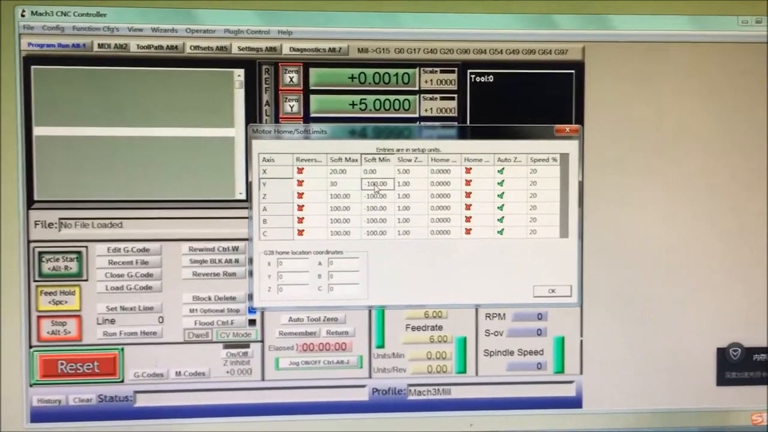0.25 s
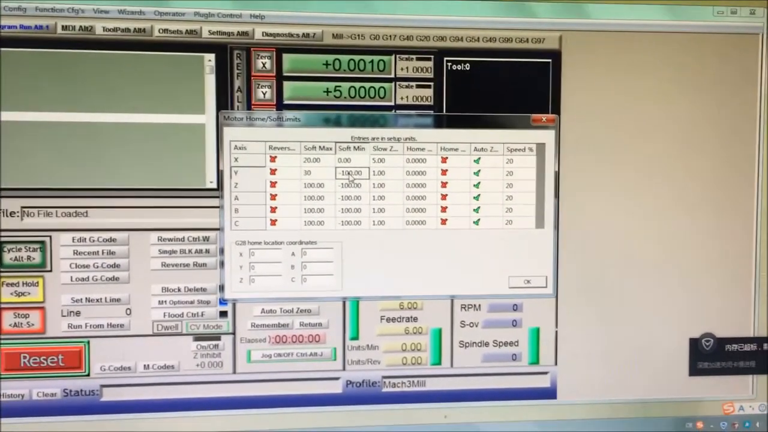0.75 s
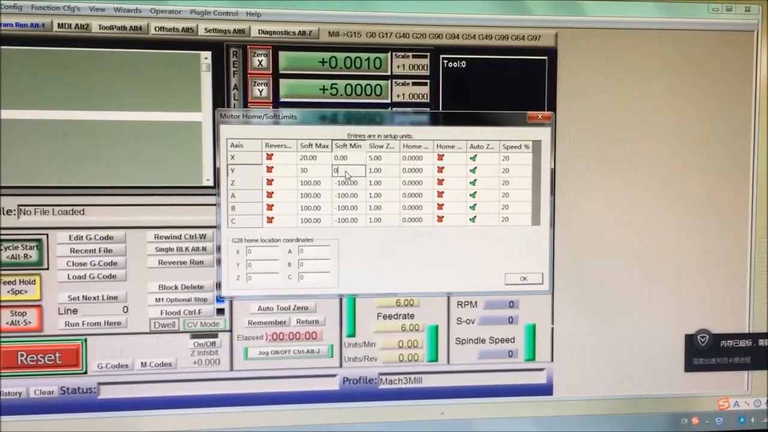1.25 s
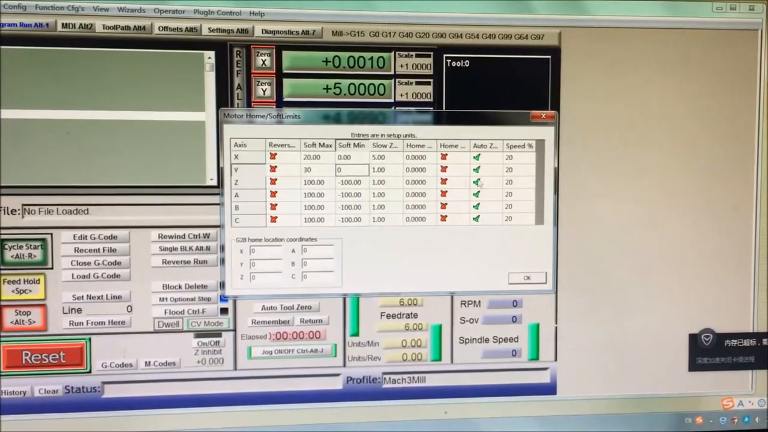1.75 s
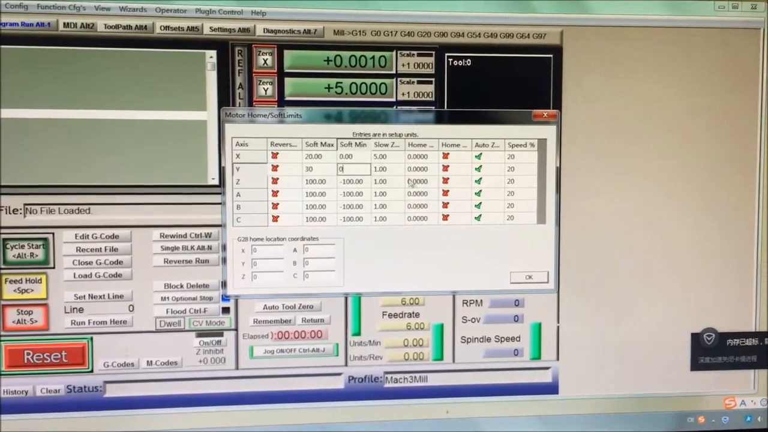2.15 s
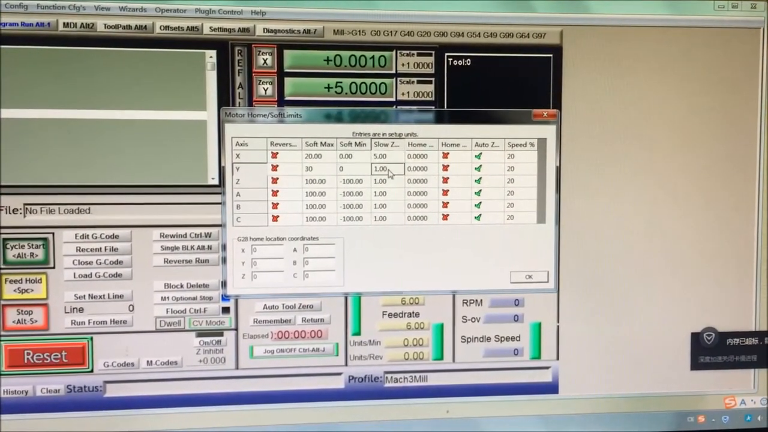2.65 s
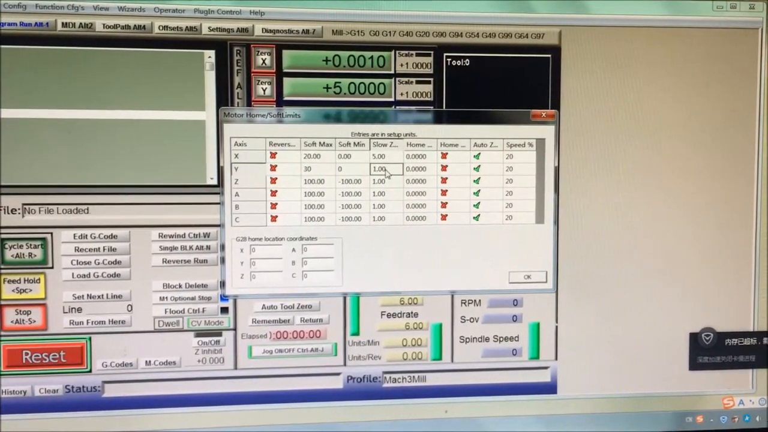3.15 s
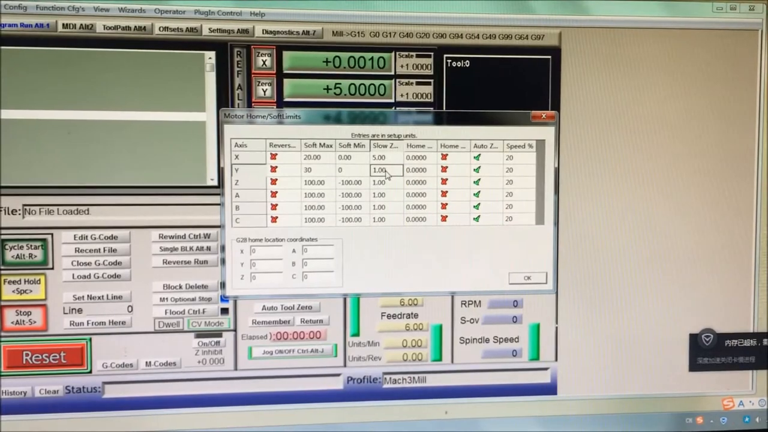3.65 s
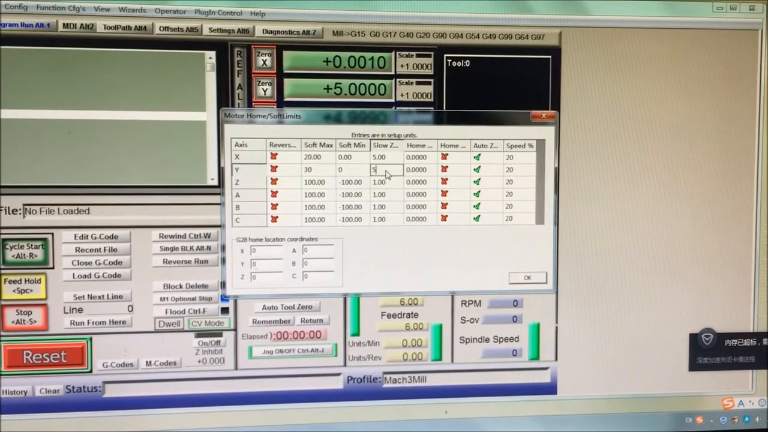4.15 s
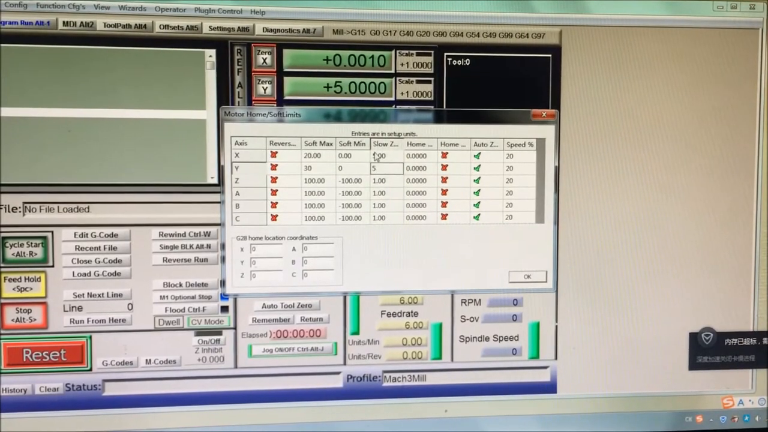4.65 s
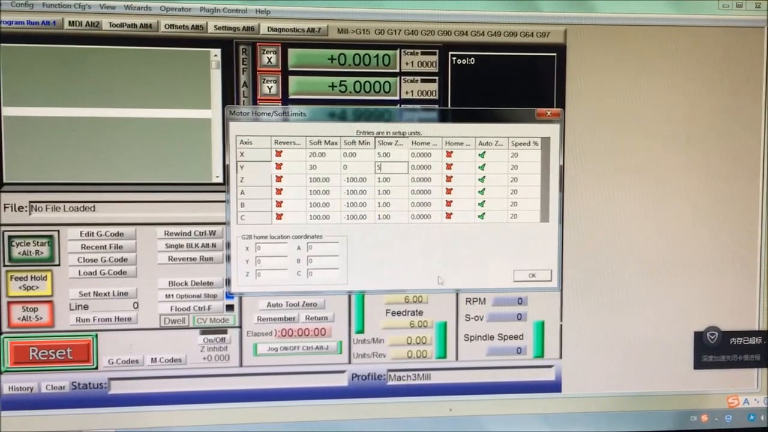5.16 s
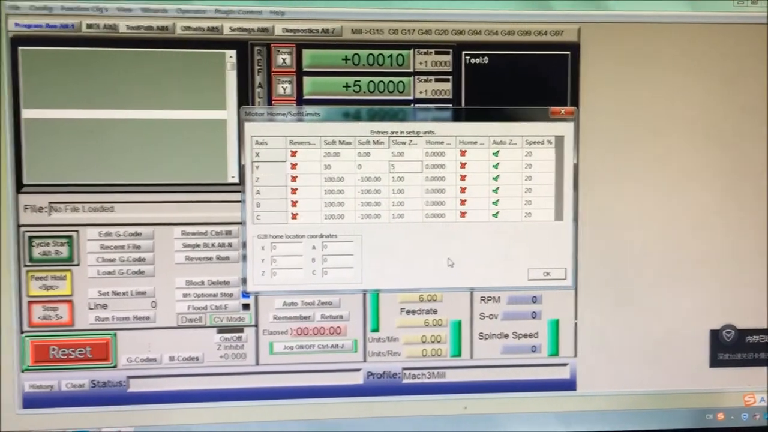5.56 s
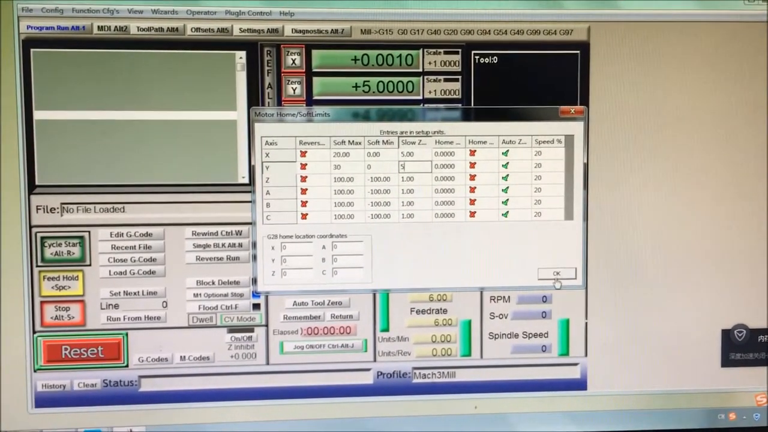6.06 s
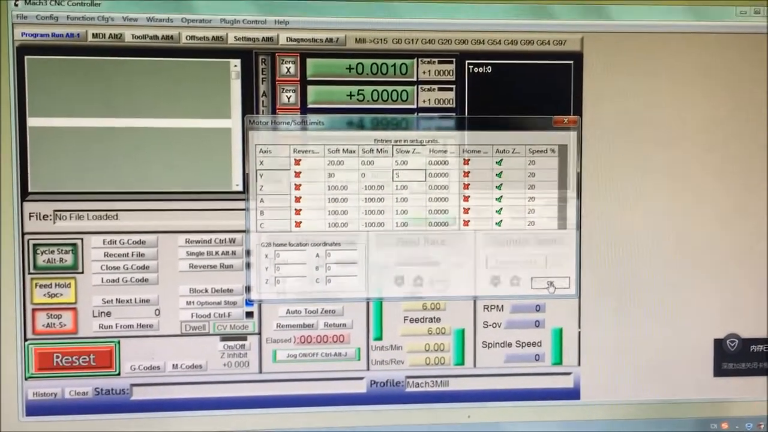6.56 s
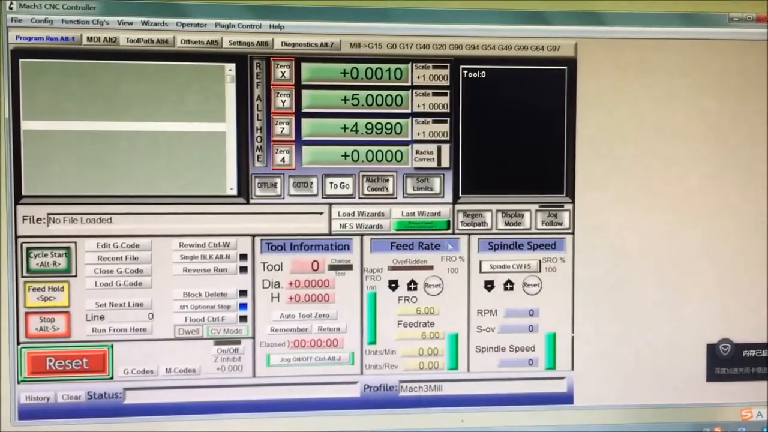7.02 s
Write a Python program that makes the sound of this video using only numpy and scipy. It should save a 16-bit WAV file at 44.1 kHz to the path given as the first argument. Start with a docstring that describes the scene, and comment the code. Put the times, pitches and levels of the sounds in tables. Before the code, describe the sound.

Scattered mouse clicks and two single keyboard keystrokes, with soft desk thumps and sleeve swishes, over a faint computer hum in a quiet room.

```python
"""A desk in a small, quiet room, where someone edits two numbers at a computer.
The mouse clicks, and twice a single keystroke thumps the desk: each impact excites damped modes of
the struck part, followed by scatter from desk and screen and by the room's reverberation.
A sleeve swishes by friction as the hand crosses to the keyboard and back to land on the mouse.
Behind it all, the computer's fan and drive hum over a low rumble and an airy hiss."""
import sys
import numpy as np
from scipy import signal
from scipy.fft import rfft, irfft, next_fast_len
from scipy.io import wavfile
from scipy.ndimage import map_coordinates

SR = 44100
rng = np.random.default_rng(int(sys.argv[2]) if len(sys.argv) > 2 else 0)


def master(y):
    """Save y as 16-bit WAV."""
    cut = np.clip(np.atleast_2d(y).T, -1, 1)
    pcm = np.round(cut * 32767)  # scale
    wavfile.write(sys.argv[1], SR, pcm.astype(np.int16))


N = 321489

# Key contacts: finger meets cap, cap bottoms out, cap springs back. Each row: start in seconds,
# cap level in dB, stem level in dB, relative case level in dB, pitch ratio, key (0 or 1).
KEY_CONTACTS = [(1.0820, -28, -37.5, -35.5, 1, 0), (1.1134, -43, -24.5, -29, 1.01, 0),
                (1.1947, -34, -26.5, -28.5, 1.004, 0), (3.8912, -29, -30.5, -35, 1.02, 1),
                (3.9155, -39, -24.5, -32, 0.92, 1), (4.0263, -30.5, -27.5, -29.5, 0.98, 1)]
# Spectra of the key cap, the stem striking its stop, and the hollow case.
# Each row: frequency in Hz, relative spectral density in dB.
CAP_SPECTRUM = [(400, -32.5), (1800, -16), (2600, 2), (4000, -1.5), (5000, 0), (6000, 2.5), (8500, -1),
                (9600, -11.5), (12000, -9.5), (15000, -12)]
STEM_SPECTRUM = [(400, -36), (1500, -15.5), (2100, -11.5), (2500, 2.5), (3350, 2.5), (3900, -11),
                 (5000, -24.5), (9000, -46)]
CASE_SPECTRUM = [(150, -25), (400, -12.5), (600, -4), (740, -9), (1000, -3.5), (1500, 5), (2000, -5),
                 (3200, -16), (4200, -26), (9000, -45)]
# Distinct modes of the keyboard's case. Each row: frequency in Hz, 60 dB decay time in seconds,
# relative level in dB under key 0, the same under key 1.
CASE_MODES = [(970, 0.07, 2.5, -14.5), (1060, 0.1, -10, 4.5), (1244, .09, -7, -18.5), (1418, 0.1, -2, -2),
              (1555, 0.14, -5.5, -6), (1780, 0.043, 2, -14.5), (1960, 0.068, 1, -16),
              (2490, 0.092, -6, -11), (2650, 0.16, -12, -11), (3110, .16, -13, -12), (3210, 0.08, -18, -10),
              (3440, 0.097, -20, -4), (8260, .11, -33, -14)]
# Partials of a freed key's spring.
# Each row: start in seconds, frequency in Hz, level in dB, 60 dB decay time in seconds.
SPRING_PARTIALS = [(1.1946, 906, -57, 1.85), (1.1946, 1463, -56.5, 0.54), (1.1946, 2835, -70, 2.2),
                   (4.026, 988, -64, 1.6), (4.026, 1787, -62, 0.62), (4.026, 2800, -69, .45),
                   (4.026, 3070, -66, 0.77)]
# Mouse clicks. Each row: start in seconds, level in dB, pitch ratio, stroke (0 press, 1 release).
BUTTON_CLICKS = [(0.0192, -38, 0.97, 1), (2.6545, -41.5, 0.97, 0), (2.8014, -37.5, 0.96, 1),
                 (5.489, -40.5, 1, 0), (5.571, -37, 0.99, 1), (6.4976, -41.5, 1, 0), (6.6310, -38, 0.98, 1)]
# Modes of the switch and its shell. Each row: nominal frequency in Hz, nominal width in Hz,
# relative level in dB on press, the same on release.
SWITCH_MODES = [(2060, 420, -34, -17.5), (3970, 440, -25, -13.5), (5300, 890, -19, -33),
                (6500, 510, -10, -10), (6975, 400, -0.5, 5), (8900, 890, -15, -8), (10050, 430, -12.5, -8),
                (11320, 400, -5.5, -5.5), (12230, 700, -6.5, -13), (14300, 1000, -11, -2.5)]
# Thin after-ring of the steel leaf. Each row: nominal frequency in Hz, 60 dB decay time in seconds,
# level in dB relative to the click on press, the same on release.
LEAF_MODES = [(6880, 0.15, -34, -31), (12100, 0.14, -17, -30), (14400, .12, -31, -19)]
# Soft bumps of the hand on plastic, and a fingernail landing on the mouse.
# Each row: start in seconds, level in dB.
HAND_BUMPS = [(1.735, -58), (3.029, -59.5), (3.847, -58), (4.5958, -41), (4.633, -44), (5.419, -58.5)]
NAIL_TAPS = [(4.8691, -31.5)]
# Spectra of the bumped shell and the nail's tap.
# Each row: frequency in Hz, relative spectral density in dB.
SHELL_SPECTRUM = [(120, 2), (220, -2), (400, -17), (700, -11), (880, 6.5), (1060, 0), (1350, -12),
                  (1800, -3.5), (2200, -17), (2750, -10.5), (3600, -19.5), (5000, -30), (12000, -42.5)]
NAIL_SPECTRUM = [(300, -23), (1000, -3.5), (1700, -6), (1950, 2.5), (2300, 2), (2600, -8), (4000, -11.5),
                 (4500, -4), (5900, -2), (7600, -14), (9200, -2.5), (10000, -18), (11500, -11),
                 (15000, -30)]
# Blows of hand and keys on the desk top. Each row: start in seconds, level in dB, frequency in Hz.
DESK_BLOWS = [(.13, -54, 190), (0.302, -51.5, 229), (1.112, -40.5, 66), (3.028, -47, 212),
              (3.085, -51.5, 148), (3.919, -38.5, 70), (4.597, -45, 132), (5.644, -54, 176),
              (6.375, -42.5, 137), (6.974, -46, 156)]
# A fingertip or key stem rubs on plastic.
# Each row: midpoint in seconds, half-duration in seconds, level in dB, centre frequency in Hz.
PLASTIC_RUBS = [(1.182, .02, -65, 7500), (2.744, 0.076, -71.5, 3250), (3.53, .12, -71.5, 3000)]
# Slides of the arm. Each row: time of reaching full speed in seconds, hold in seconds,
# release time in seconds, level in dB.
ARM_SLIDES = [(.29, .05, .45, -73), (0.628, 0.073, 0.64, -62), (1.337, 0.026, .3, -58.5),
              (1.7, 0.045, 0.22, -72), (3.244, 0.15, 0.31, -60), (3.6, 0.17, 0.59, -71.5),
              (4.22, 0.12, 0.15, -58), (4.61, 0.062, 0.2, -62.5)]
# Spectrum of sliding cloth. Each row: frequency in Hz, relative spectral density in dB.
CLOTH_SPECTRUM = [(400, -5.5), (1200, -1.5), (2600, -3.5), (3050, -3), (3500, -3), (4900, -5.5),
                  (5450, -0.5), (6900, -0.5), (7600, -4), (8400, -1.5), (9000, -2), (10400, -5.5),
                  (12500, -1), (15500, -9)]
# Tones of the drive and fan. Each row: frequency in Hz, relative level in dB.
HUM_TONES = [(91.5, -65), (204.6, -70), (613.7, -81.5), (1292, -84.5), (1432, -83), (1567, -84),
             (1637, -77.5)]
# Spectra of the computer case's rumble and the fan's hiss.
# Each row: frequency in Hz, relative spectral density in dB.
RUMBLE_SPECTRUM = [(30, -17), (41, -3), (49, 4.5), (60, -2.5), (72, -1.5), (105, -8), (138, -2),
                   (165, -5.5), (205, -3), (240, -12.5), (305, -12), (370, -20.5), (500, -25.5), (900, -66)]
HISS_SPECTRUM = [(250, -5.5), (450, -4), (600, 3.5), (760, -1.5), (1100, -3), (1600, -2.5), (1850, -4.5),
                 (2800, -8), (4900, -15), (6000, -12), (7700, -15.5), (9500, -11.5), (10400, -15),
                 (12500, -10.5), (15500, -15)]
# Reverberation of the room. Each row: frequency in Hz, 60 dB decay time in seconds.
ROOM_DECAY = [(200, 0.37), (1000, 0.67), (3000, 0.41), (7000, 0.31), (14000, 0.43)]

HIT = 32768  # samples in one impact response
HIT_T, HIT_HZ = np.arange(HIT) / SR, np.fft.rfftfreq(HIT, 1 / SR)


def keyboard():
    """Impact excitation: each contact ticks the cap, clacks the stem and rings the less damped case."""
    out = np.zeros(N)
    for start, cap_db, stem_db, case_db, pitch, key in KEY_CONTACTS:
        hz = HIT_HZ / pitch
        cap = impact(colour(CAP_SPECTRUM, hz), t60=0.018, rise_s=0.00087,
                     snap_db=-0.5, desk_db=-18.5, room_db=-23.5)
        stem = impact(colour(STEM_SPECTRUM, hz), t60=0.022, rise_s=0.001,
                      snap_db=5, desk_db=-21.5, room_db=-22.5)
        case = impact(colour(CASE_SPECTRUM, hz), t60=0.068, rise_s=0.0021,
                      snap_db=-18.5, desk_db=-12, room_db=-14)
        add(out, start, amp(cap_db) * cap + amp(stem_db) * stem)
        add(out, start, amp(case_db - 3.5) * case + amp(case_db - 4.5) * case_ring(key))
    return out


def case_ring(key):
    """Modal superposition: where the key sits sets how strongly each mode of the case is excited."""
    ring = np.zeros(HIT)
    for hz, t60, key0_db, key1_db in CASE_MODES:
        db = (key1_db if key else key0_db) + rng.normal(0, 1.5)  # each contact shares energy anew
        ring += amp(db) * decay(t60) * np.sin(2 * np.pi * (hz * HIT_T + rng.random()))
    onset = 1 - np.exp(-HIT_T / 0.0013)
    return burst(ring * onset)


def key_springs():
    """Free vibration: the spring of a released key rings on in lightly damped partials."""
    out = np.zeros(N)
    for start, hz, db, t60 in SPRING_PARTIALS:
        add(out, start, amp(db) * decay(t60) * np.sin(2 * np.pi * hz * HIT_T))
    return out


def mouse_button():
    """Snap-through: the leaf flips over and back, ringing the same modes at different strengths."""
    out = np.zeros(N)
    for start, db, pitch, released in BUTTON_CLICKS:
        power = amp(-29.5) ** 2  # floor between the resonances
        for hz, width, press_db, release_db in SWITCH_MODES:
            detuning = 2 * (HIT_HZ / pitch - hz) / width
            power += amp(release_db if released else press_db) ** 2 / (1 + detuning ** 2) ** 1.63
        bass_cut = HIT_HZ / (HIT_HZ + 600)
        click = impact(np.sqrt(power) * bass_cut, t60=0.016, rise_s=0.00096,
                       snap_db=-1.5, desk_db=-19.5, room_db=-19.5)
        add(out, start, amp(db) * click)
        for hz, t60, press_db, release_db in LEAF_MODES:
            ring = decay(t60) * np.sin(2 * np.pi * hz * pitch * HIT_T)
            add(out, start, amp(db + (release_db if released else press_db)) * ring)
    return out


def hand_contacts():
    """Contact hardness sets brightness: the soft hand bumps plastic dully, the nail taps it sharply."""
    out = np.zeros(N)
    for start, db in HAND_BUMPS:
        bump = impact(colour(SHELL_SPECTRUM, HIT_HZ), t60=0.036, rise_s=0.0015,
                      snap_db=0, desk_db=-11, room_db=-17.5)
        add(out, start, amp(db) * bump)
    for start, db in NAIL_TAPS:
        tap = impact(colour(NAIL_SPECTRUM, HIT_HZ), t60=0.027, rise_s=0.00058,
                     snap_db=0.5, desk_db=-11.5, room_db=-17.5)
        add(out, start, amp(db) * tap)
    return out


def desk_thumps(decay_cycles=16.3):
    """Constant-Q damping: the desk top rings for a set number of cycles, so deep thumps last longer."""
    out = np.zeros(N)
    for start, db, hz in DESK_BLOWS:
        resonance = (HIT_HZ / hz) ** 3 / (1 + (HIT_HZ / hz) ** 6)
        thump = impact(resonance, t60=decay_cycles / hz, rise_s=0.89 / hz,
                       snap_db=-4.5, desk_db=-14, room_db=-14)
        add(out, start, amp(db) * thump)
    return out


def plastic_rubs():
    """Sliding friction: a fingertip or key stem on plastic gives a brief swell of band-limited noise."""
    out = np.zeros(N)
    for middle, half_s, db, hz in PLASTIC_RUBS:
        band = 1 / (1 + (2.9 * np.log((HIT_HZ + 1) / hz)) ** 2) ** 2
        friction = unit(irfft(rfft(rng.standard_normal(HIT)) * band))
        swell = np.sin(np.pi * np.minimum(HIT_T / (2 * half_s), 1)) ** 2
        add(out, middle - half_s, amp(db) * friction * swell)
    return out


def sleeve(attack_s=0.18, release_drop_db=18):
    """Friction noise: cloth on the desk swells and dies with the arm's speed; its weave flutters it."""
    t = np.arange(N) / SR
    power = np.zeros(N)  # incoherent swishes add in power
    for full_speed_at, hold_s, release_s, db in ARM_SLIDES:
        swell = np.cos(np.pi / 2 * np.clip((full_speed_at - t) / attack_s, 0, 1)) ** 2
        slowing_db = release_drop_db * np.maximum(t - full_speed_at - hold_s, 0) / release_s
        power += (swell * amp(db - slowing_db)) ** 2
    flutter = amp(0.66 * wobble(52))
    return np.sqrt(power) * flutter * noise(CLOTH_SPECTRUM)


def computer():
    """Tonal and broadband machine noise: fan and drive hum unsteadily over case rumble and air hiss."""
    t = np.arange(N) / SR
    tones = np.zeros(N)
    for hz, db in HUM_TONES:
        level = amp(db + 0.83 * wobble(3.06))
        phase = 2 * np.pi * hz * t + 0.75 * wobble(4)
        tones += level * np.sqrt(2) * np.sin(phase)
    rumble = amp(-60.5 + 0.36 * wobble(4.6)) * noise(RUMBLE_SPECTRUM)
    hiss = amp(-67.5) * noise(HISS_SPECTRUM)
    return amp(-1) * tones + rumble + hiss


def impact(gain, t60, rise_s, snap_db, desk_db, room_db):
    """Impulse response: a snap and dense ringing, then scatter from desk and screen, then the room."""
    response = minimum_phase(gain)
    snap = amp(snap_db) * burst(irfft(response))
    ring = filtered_burst(dying_noise(t60, rise_s), response)
    scatter = filtered_burst(dying_noise(t60=0.098, rise_s=0.0075), response)
    # Sound sent out in all directions returns with blunter peaks than the direct path has.
    spread = np.geomspace(0.9, 1.11, 15)
    diffuse_power = sum(np.interp(HIT_HZ * ratio, HIT_HZ, gain ** 2) for ratio in spread)
    reverberation = filtered_burst(room_tail(), minimum_phase(np.sqrt(diffuse_power)))
    return burst(snap + ring) + amp(desk_db) * scatter + amp(room_db) * reverberation


def room_tail(build_up_s=0.0064):
    """Reverberation: the diffuse field decays exponentially in each band, the midrange most slowly."""
    hz, t, bands = signal.stft(rng.standard_normal(HIT), SR, nperseg=256)
    fading = amp(-60 * t / log_interp(ROOM_DECAY, hz)[:, None])
    tail = signal.istft(bands * fading, SR, nperseg=256)[1][:HIT]
    return tail * (1 - np.exp(-(HIT_T / build_up_s) ** 2))


def dying_noise(t60, rise_s):
    """Many overlapping modes or reflections merge into noise that builds up and decays."""
    onset = 1 - np.exp(-(HIT_T / rise_s) ** 2)
    return rng.standard_normal(HIT) * decay(t60) * onset


def decay(t60):
    """Exponential damping: a fall of 60 dB in t60 seconds."""
    return amp(-60 * HIT_T / t60)


def minimum_phase(gain):
    """Causality: folding the cepstrum gives a response of this gain that rings only after the blow."""
    cepstrum = irfft(np.log(np.maximum(gain, 1e-5)))
    cepstrum[1:HIT // 2] *= 2
    cepstrum[HIT // 2 + 1:] = 0
    return np.exp(rfft(cepstrum))


def filtered_burst(drive, response):
    """Convolution: the drive passes through a frequency response and is scaled as a burst."""
    return burst(irfft(rfft(drive) * response))


def noise(spectrum):
    """Spectral shaping of white noise gives steady coloured noise of rms 1."""
    size = next_fast_len(N + 8192)
    gain = colour(spectrum, np.fft.rfftfreq(size, 1 / SR))
    return unit(irfft(rfft(rng.standard_normal(size)) * gain, size)[:N])


def wobble(rate):
    """Random modulation: a smooth curve through rate random values a second."""
    knots = rng.standard_normal(int(N * rate / SR) + 4)
    return map_coordinates(knots, [np.arange(N) * rate / SR])


def colour(spectrum, hz):
    """Gain of a (Hz, dB) spectral envelope, falling 12 dB an octave below its first point."""
    return amp(log_interp(spectrum, hz)) * np.minimum(1, hz / spectrum[0][0]) ** 2


def log_interp(points, hz):
    """Interpolation of (Hz, value) points on a logarithmic frequency axis."""
    frequencies, values = np.transpose(points)
    return np.interp(np.log(hz + 1), np.log(frequencies + 1), values)


def burst(x):
    """Normalisation to the energy of five milliseconds at rms 1."""
    return unit(x) * np.sqrt(0.005 * SR / len(x))


def unit(x):
    """Normalisation to rms 1."""
    return x / np.sqrt(np.mean(x ** 2) + 1e-20)


def amp(db):
    """Amplitude ratio of a level in decibels."""
    return 10 ** (np.asarray(db) / 20)


def add(track, start, sound):
    """Superposition of a sound on the track from start seconds."""
    part = track[max(0, round(start * SR)):][:len(sound)]
    part += sound[:len(part)]


def scene():
    """Linear superposition: all sources sum at one point before the screen."""
    keys_and_clicks = keyboard() + key_springs() + mouse_button()
    handling = hand_contacts() + desk_thumps() + plastic_rubs() + sleeve()
    return (keys_and_clicks + handling + computer())[None]


def record(dry, cutoff_hz=15900, edge_hz=300):
    """Band limiting: a steep low-pass filter removes the highest treble."""
    size = next_fast_len(N + 8192)
    hz = np.fft.rfftfreq(size, 1 / SR)
    low_pass = np.clip((cutoff_hz - hz) / edge_hz + 0.5, 0, 1)
    return irfft(rfft(dry, size) * low_pass, size)[..., :N]


dry = scene()
out = record(dry)
master(out)
```